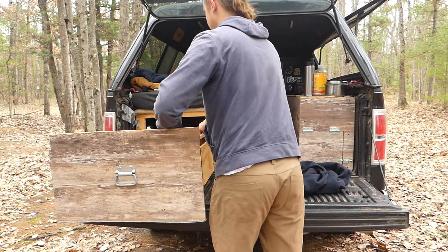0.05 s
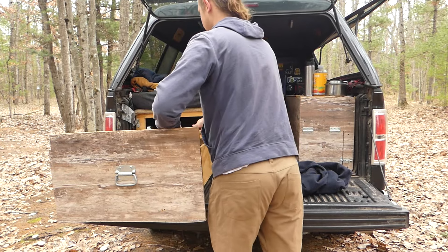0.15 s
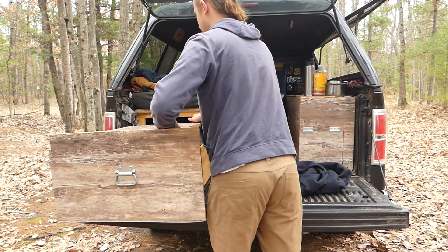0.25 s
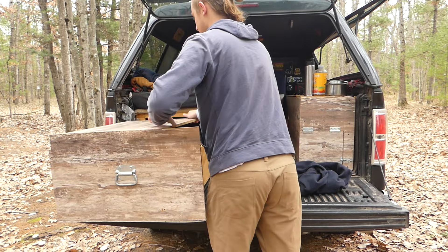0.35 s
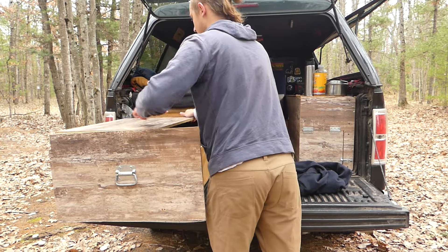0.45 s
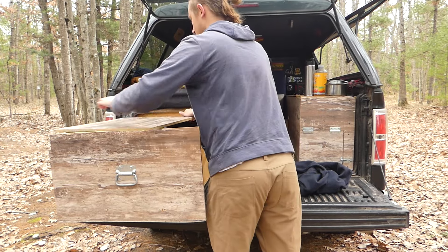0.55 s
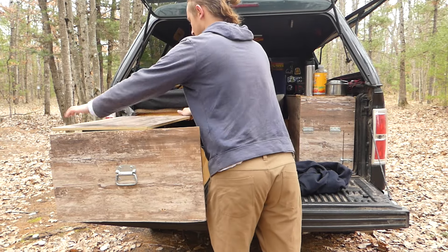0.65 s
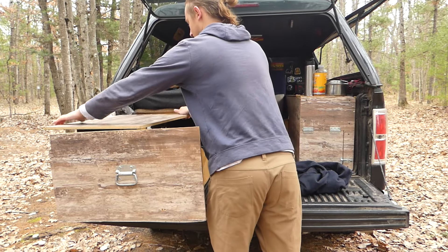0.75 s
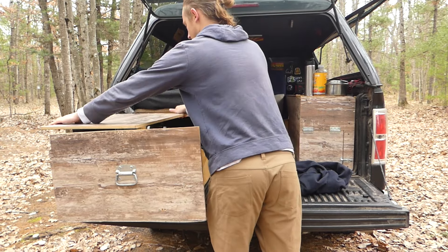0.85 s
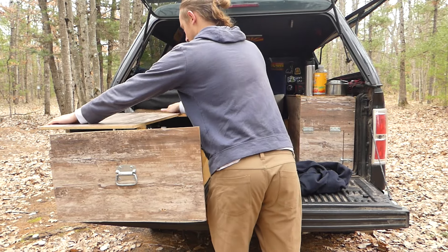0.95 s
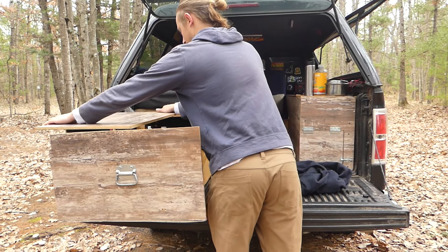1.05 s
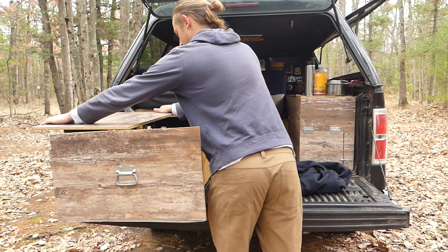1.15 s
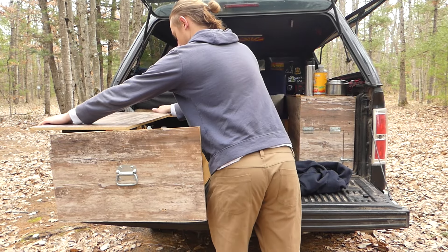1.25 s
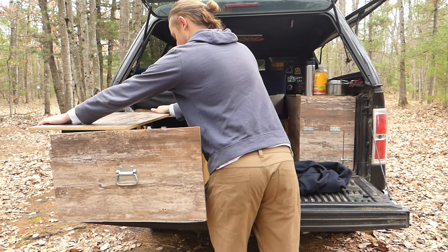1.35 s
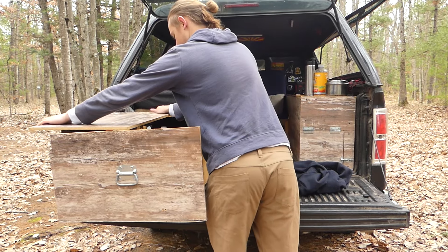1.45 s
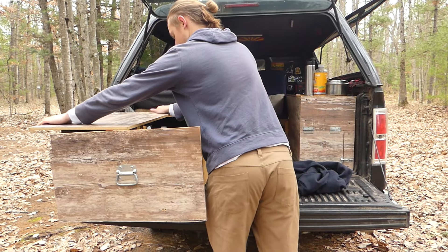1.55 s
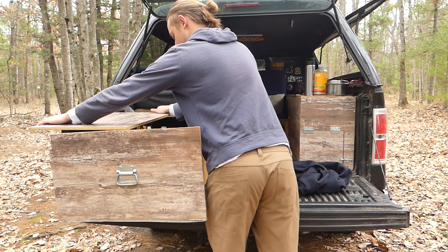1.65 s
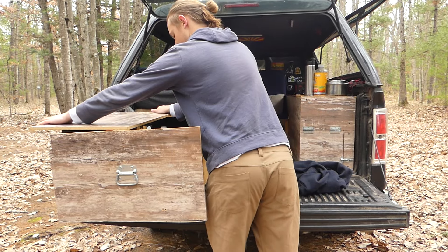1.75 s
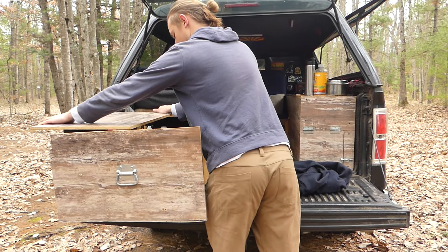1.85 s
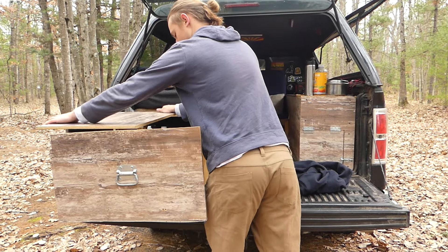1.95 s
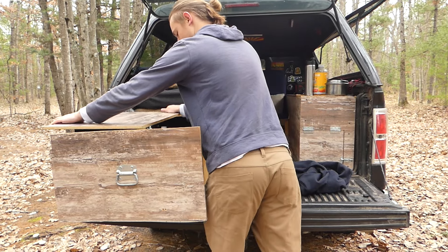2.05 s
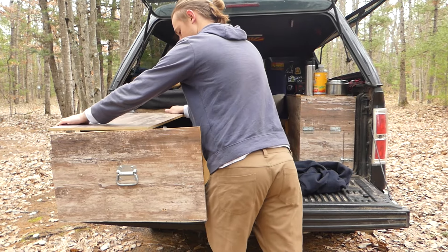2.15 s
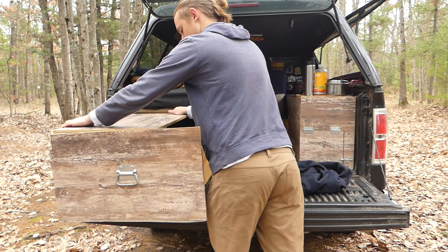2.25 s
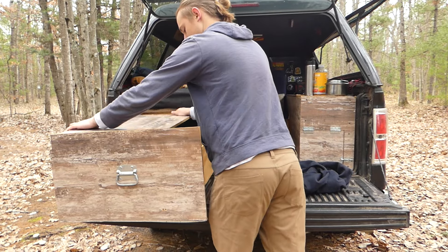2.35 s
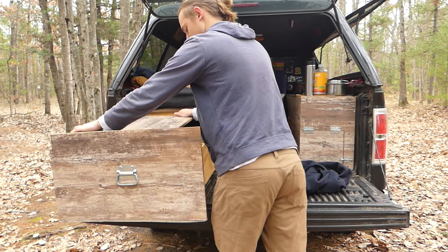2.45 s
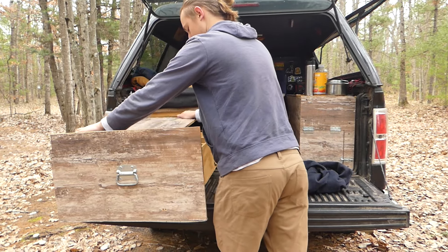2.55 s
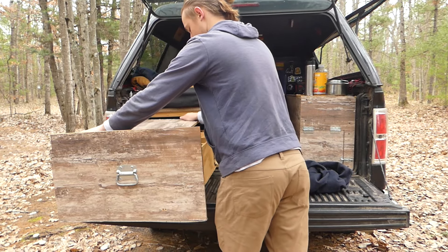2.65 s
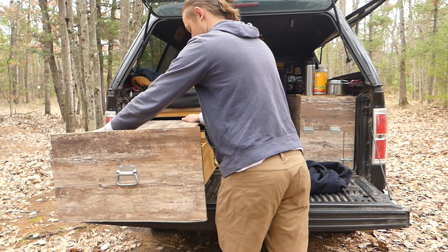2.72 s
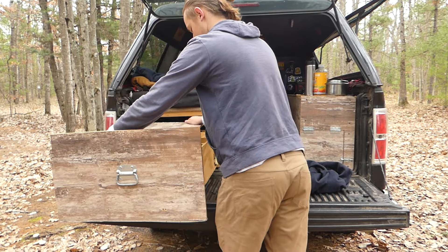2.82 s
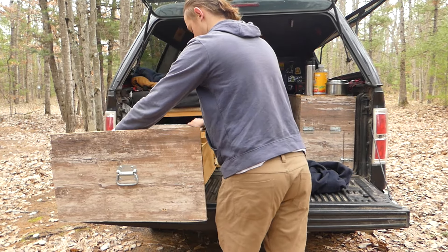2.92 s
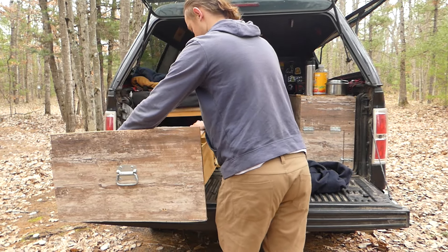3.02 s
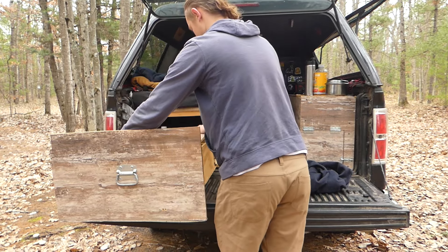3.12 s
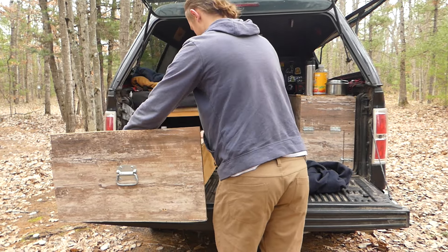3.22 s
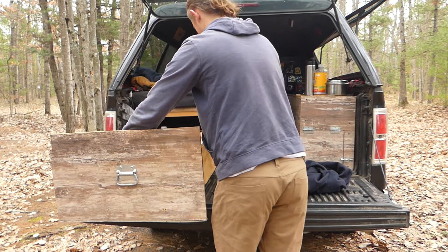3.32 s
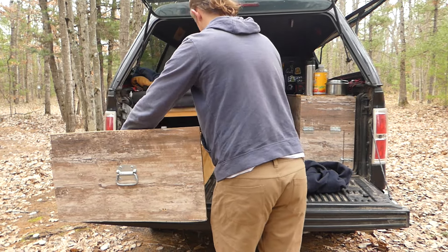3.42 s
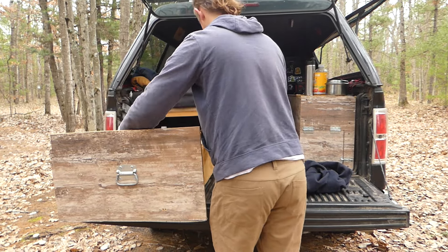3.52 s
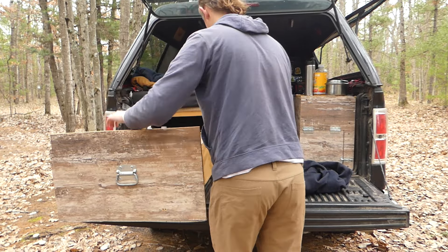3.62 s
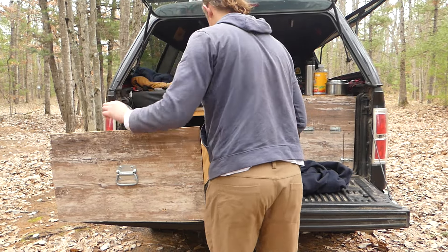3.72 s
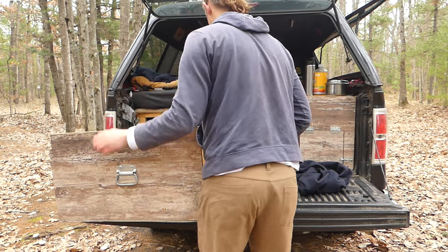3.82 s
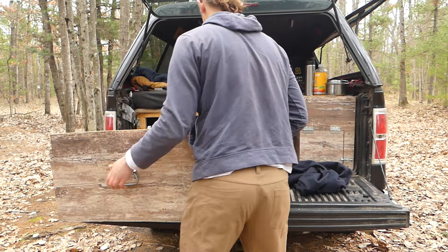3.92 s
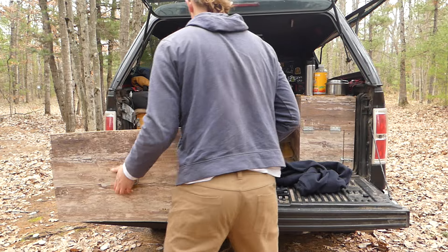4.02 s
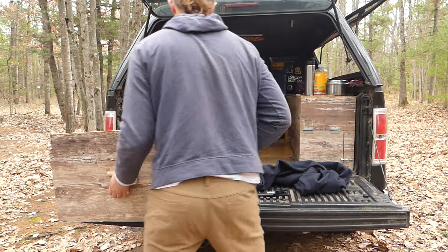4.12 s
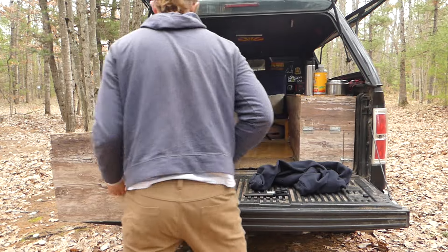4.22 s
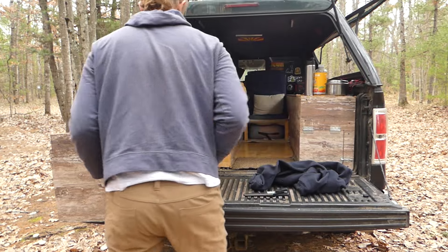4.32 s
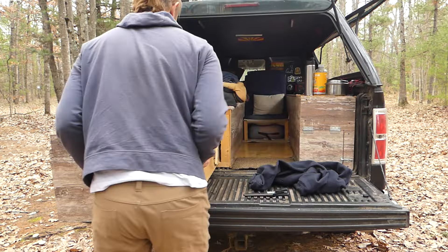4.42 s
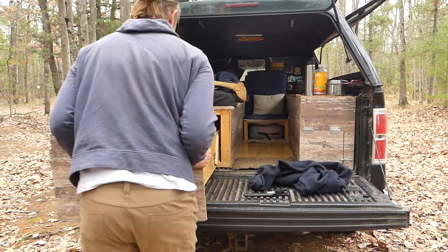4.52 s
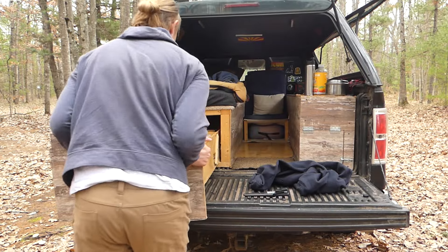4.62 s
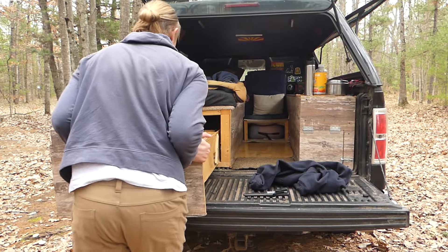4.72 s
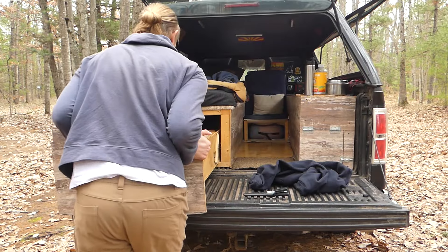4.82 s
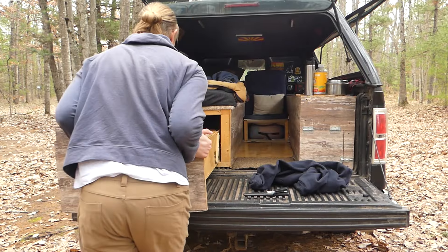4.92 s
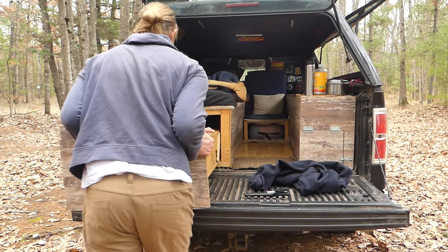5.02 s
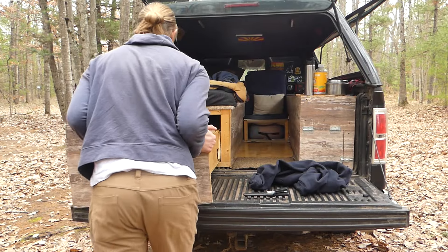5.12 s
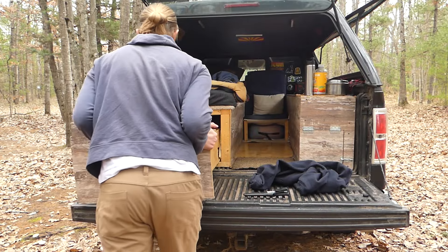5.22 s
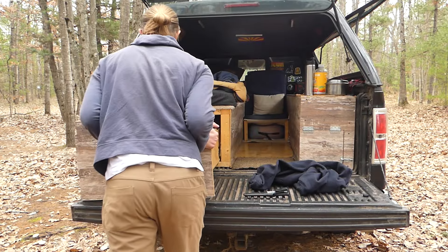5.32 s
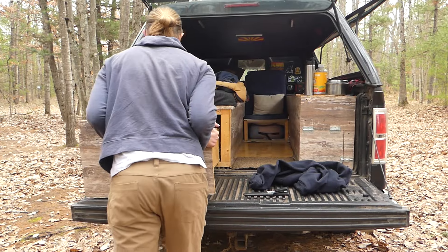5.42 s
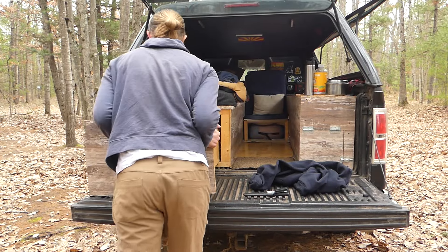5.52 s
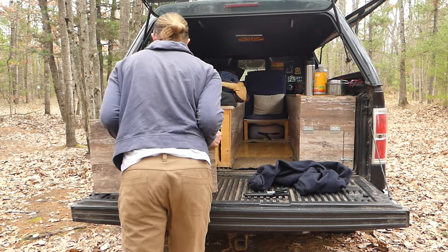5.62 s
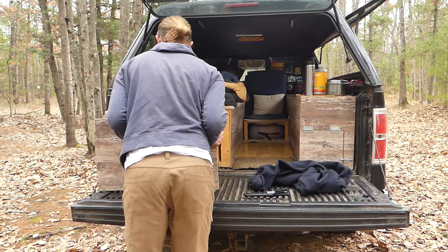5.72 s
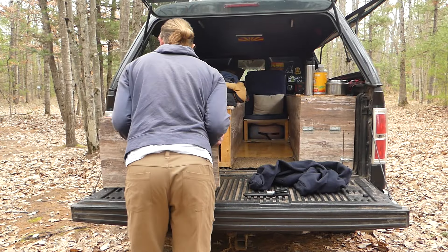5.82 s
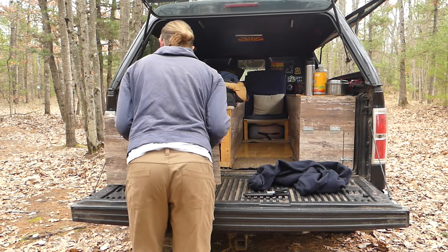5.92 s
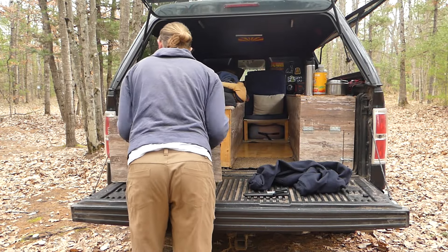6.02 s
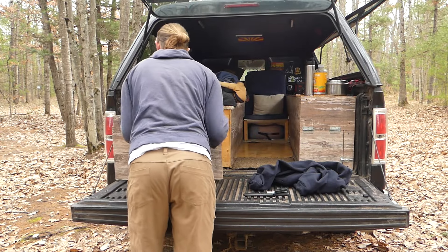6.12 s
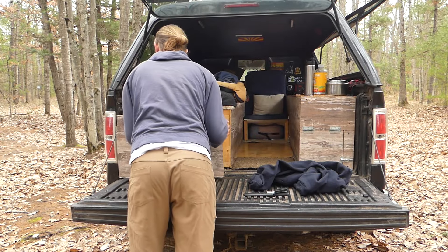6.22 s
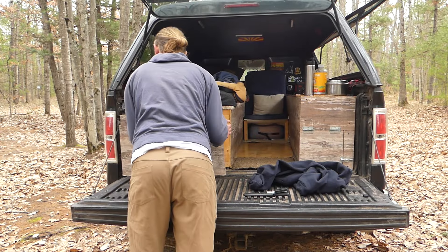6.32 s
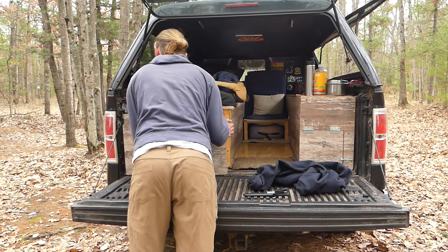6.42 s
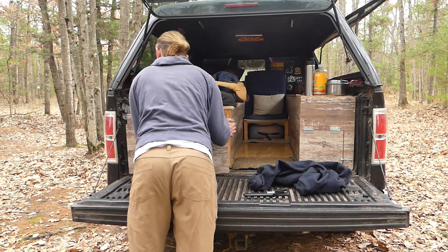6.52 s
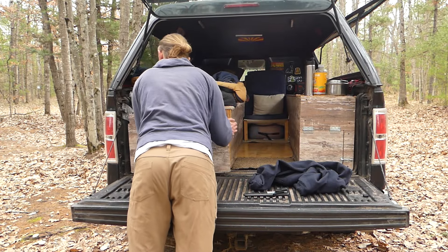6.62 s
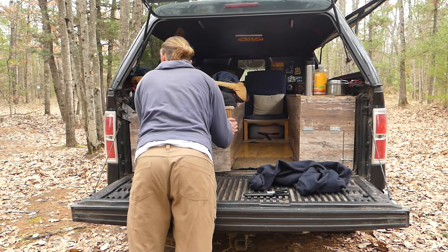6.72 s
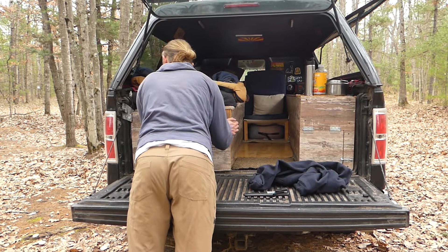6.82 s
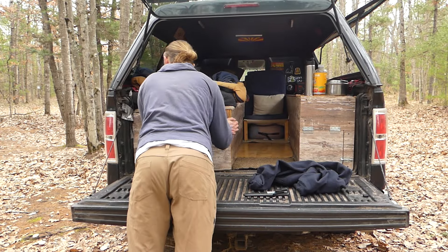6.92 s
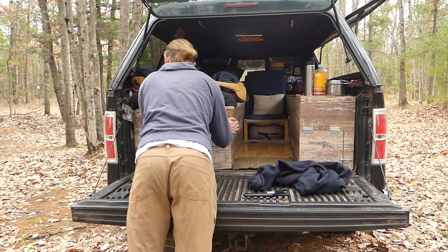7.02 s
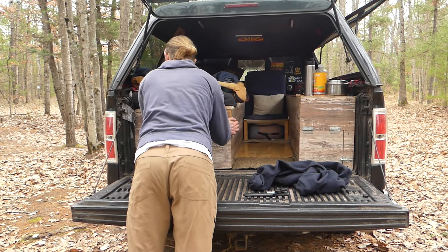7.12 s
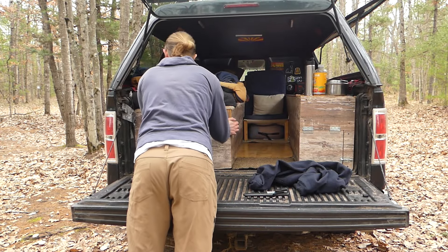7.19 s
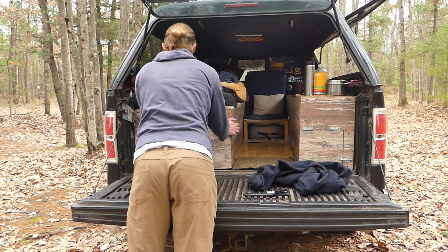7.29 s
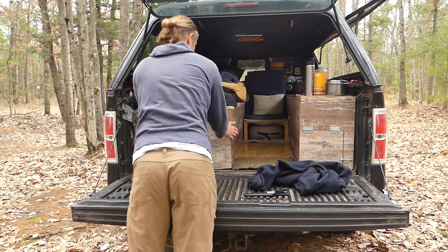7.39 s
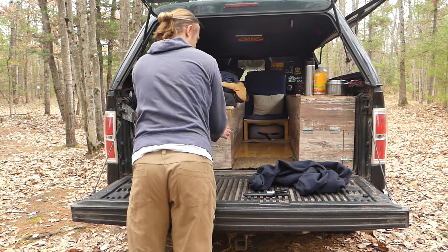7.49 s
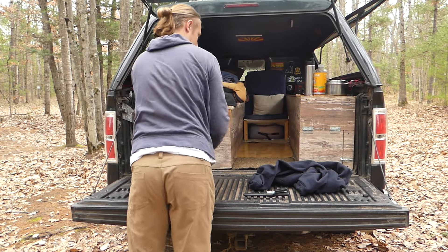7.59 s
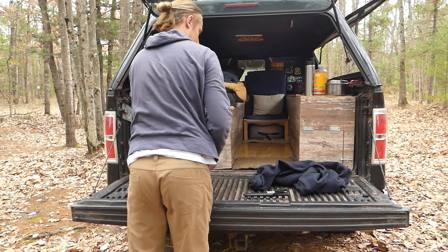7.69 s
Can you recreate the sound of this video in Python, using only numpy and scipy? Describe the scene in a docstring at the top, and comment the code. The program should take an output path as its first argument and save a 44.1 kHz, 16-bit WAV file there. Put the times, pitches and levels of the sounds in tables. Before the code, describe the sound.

Outdoors beside an open truck bed, a wooden lid scrapes and bumps, with a quiet gap before a groaning drag and several hard drops. A sleeve rustles, handles tick, and the drawer front clatters. The heavy drawer jolts, grinds inward with gritty rumbling and bangs shut, followed by another short shove. Near, mostly dry stereo pickup, a faint shell echo and soft forest air.

```python
"""In the still air of a wood, close by, a plywood lid scrapes, moans and drops onto a long wooden drawer.
The drawer, at a truck bed, rattles, chatters after each shove, rumbles along its runners and slams.
Blows are struck wood modes and noise bursts; rubbing is noise shaped by the wood and by uneven gains.
Clothes rustle, small fittings click, and the truck's shell answers each blow with a short noise tail.
The stereo microphone sheds deep bass, and the recorder has a limited top end."""
import sys
import numpy as np
from scipy import signal
from scipy.fft import rfft, irfft, next_fast_len
from scipy.io import wavfile
from scipy.ndimage import uniform_filter1d, map_coordinates

SR = 44100
rng = np.random.default_rng(int(sys.argv[2]) if len(sys.argv) > 2 else 0)


def store_wav(level_fs):
    """Save 16-bit WAV to argv[1]."""
    pcm = np.round(np.clip(np.atleast_2d(level_fs), -1, 1) * 32767)
    wavfile.write(sys.argv[1], SR, pcm.T.astype(np.int16))


N = 341775  # length in samples

# Stereo width of near sounds, then of the air. Each row: frequency in Hz, left-right correlation.
NEAR_CORRELATION = [(40, 0.24), (130, 0.88), (600, 0.88), (2000, 0.86), (6000, 0.83), (13000, 0.7)]
AIR_CORRELATION = [(60, -0.51), (150, -0.91), (380, -0.69), (950, -0.43), (2380, -0.094), (5980, 0.63),
                   (15000, 0.54)]

# Noise colours, only relative. Each row: frequency in Hz, density in dB per Hz.
# The air of the wood:
AIR_SPECTRUM = [(15, -44), (25, -17), (75, -8), (107, -3), (152, -1), (313, -2), (421, 0), (536, -2.5),
                (597, -4.5), (1410, -12), (1530, -14), (2480, -16), (3080, -22), (5720, -23), (15500, -23)]
# The lid's low groan and upper rasp as it drags:
GROAN_SPECTRUM = [(60, -18), (130, -4), (220, 1.5), (290, 5.5), (380, -2.5), (600, -23), (900, -11.5),
                  (1400, -30)]
RASP_SPECTRUM = [(500, -1), (780, 6), (1200, -7.5), (1650, -4), (2100, 1.5), (3000, -6.5), (4000, -12),
                 (8000, -14)]
# The dense modes of plywood:
PLYWOOD_SPECTRUM = [(40, -41), (70, -12), (110, -23), (160, -9.5), (300, -4), (560, -5.5), (800, -9),
                    (1100, -11), (1800, -12), (3000, -17), (5000, -33), (8000, -44.5), (12000, -52.5),
                    (16000, -62)]
# Soft brushing, fine fizz of cloth, and dry rustling:
SWISH_SPECTRUM = [(300, -17.5), (700, -5.5), (1050, -2), (1600, -6.5), (2600, -12), (5000, -34.5)]
FIZZ_SPECTRUM = [(1500, -28), (3000, 2.5), (4800, 2), (8000, -4.5), (11000, -3), (15500, -10)]
CRISP_SPECTRUM = [(1500, -9), (3500, 2), (6000, -0.5), (8000, -6), (11000, 0.5), (13000, -1), (15500, -9)]
# The sliding drawer's rumble, gritty scrape and hiss:
RUMBLE_SPECTRUM = [(24, -60), (40, -39), (102, -6), (125, -3), (146, 2.5), (221, -2), (258, 3), (374, -0.5),
                   (483, -2.5), (624, 1.5), (829, -8.5), (916, -4.5), (1200, -19), (1560, -51),
                   (2640, -120)]
SCRAPE_SPECTRUM = [(500, -2.5), (1000, 2), (2300, -2.5), (3500, -8.5), (5500, -13), (8000, -19.5),
                   (14000, -17.5)]
HISS_SPECTRUM = [(3000, -16), (6000, 1), (8000, -10), (11500, 5), (14000, -14), (16000, -12)]
# A fitting's tick, the slam's crack and shiver, and the flat start of the shell's tail:
TICK_SPECTRUM = [(1000, 22.5), (4000, 9.5), (8000, -7.5), (12000, 1.0), (16000, -18)]
CRACK_SPECTRUM = [(60, -30), (200, 0), (700, 8.5), (2500, -5.5), (6000, -9.5), (15000, -19)]
SHIVER_SPECTRUM = [(100, -27), (200, 2.5), (450, 2), (700, 0.0), (1200, -14), (3500, -12.5),
                   (7000, -43), (15000, -59)]
FLAT_SPECTRUM = [(100, 0), (15000, 0)]

# Modes of lid, box, front panel and end stop. Each row: frequency in Hz, relative level in dB, t60 in seconds.
LID_MODES = [(202.5, -7.5, 0.18), (231.5, -1.5, 0.12), (293.4, -7.5, 0.34), (411.4, 0, 0.2),
             (539, -4.5, 0.14), (781, -4, 0.063), (1133, -18, 0.14), (1576, -10, 0.051), (1717, -14, 0.11),
             (2070, -23, 0.12), (2790, -21, 0.08)]
BOX_MODES = [(75, -28, 0.6), (112.5, -9, 0.31), (148.3, -1, 0.17), (228, -1, 0.084), (292.8, -3, 0.3),
             (343, -1.5, 0.056), (384.4, -3, 0.08), (403.5, -5, 0.085), (508, -8, 0.19), (548.5, -5, 0.15),
             (720, -10, 0.083)]
FRONT_MODES = [(265.5, -8.5, 0.11), (303, 0, 0.062), (328.5, -1.5, 0.15), (520, -4, 0.044),
               (619.5, -11.5, 0.26), (785, -11, 0.28), (1016, -8.5, 0.11), (1695, -17.5, 0.2),
               (2323, -8.5, 0.099), (2780, -11.5, 0.1), (3153, -5.5, 0.04), (3750, -14.5, 0.053)]
STOP_MODES = [(652, -7.5, 0.059), (716, 1.5, 0.031), (840, -4.5, 0.031), (678, -24, 0.33), (757, -23, 0.21),
              (302, -16.5, 0.11), (2250, -21, 0.033)]
# Decay of the truck's shell. Each row: frequency in Hz, t60 in seconds.
SHELL_DECAY = [(100, 0.41), (400, 0.63), (1000, 0.43), (3000, 0.94), (8000, 0.93), (15000, 0.36)]

# The lid drags over the rim. Each row: start in seconds, length in seconds, groan and rasp in dB before trim.
LID_DRAGS = [(0.03, .46, -47, -51), (.23, .1, -41, -58), (0.66, .42, -49, -58), (2.33, .11, -50, -60),
             (2.54, .14, -48, -45), (2.74, .54, -37, -35), (3.36, .15, -43, -36)]
# The lid bumps and drops. Each row: start in seconds, level in dB before trim, hardness in dB,
# ring t60 in seconds.
LID_DROPS = [(0.123, -30, -12.5, 0.29), (0.168, -27.5, -11.5, 0.14), (0.622, -14, -36, 0.075),
             (0.738, -36, -26, 0.11), (0.782, -32, -26, 0.068), (0.932, -17.5, -15, 0.1),
             (2.493, -10, -28, 0.1), (2.788, -28.5, -13.5, 0.073), (3.15, -11, -18, .17),
             (3.177, -18.5, -32, 0.21), (3.286, -11, -5.5, 0.16), (3.293, -5, -6, 0.22),
             (3.303, -10.5, 2, 0.079), (3.344, -19, -15, .07)]
# Wood scuffs wood. Each row: start in seconds, level in dB before trim, rise in seconds (held to 3 ms or more).
SCUFFS = [(.348, -39.5, 0.012), (.403, -35, 0.0097), (.578, -29.5, 0.016), (0.598, -27.5, 0.01),
          (1.839, -38, 0.005), (2, -30, 0.0059), (2.058, -26.5, 0.0036), (2.064, -32.5, 0.024),
          (2.084, -37, 0.0024), (3.148, -18.5, 0.0058), (3.172, -25, .014), (3.27, -26, .014),
          (5.261, -29, 0.024), (5.405, -14.5, 0.027), (5.828, -24.5, 0.012), (5.9, -34, .02),
          (5.995, -20.5, 0.014), (6.623, -28.5, 0.011), (7.152, -13, 0.0085)]
# Small hard fittings. Each row: start in seconds, level in dB before trim, bite in dB against the treble,
# chatter t60 in seconds.
CLICKS = [(0.606, -35.5, 4, .05), (0.9236, -38.5, 4.5, .09), (3.2121, -33.5, -4, .067),
          (3.83, -37, 10, .018), (4.113, -28, 4, .05), (4.1256, -16, 6, 0.031), (4.133, -22, -6, .06),
          (4.1614, -35, 17.5, 0.035), (4.203, -31.5, 3, 0.06), (4.321, -21, -4, 0.07),
          (4.437, -20, -4, 0.085), (4.452, -19, -3, 0.074), (4.8428, -19.5, 2.5, 0.087),
          (4.927, -19, -1, 0.16), (6.8793, -21, 0, 0.066), (7.496, -16, -6, 0.077)]
# A hand brushes the lid. Each row: start in seconds, length in seconds, level in dB before the cloth mix.
HAND_BRUSHES = [(1.82, 0.39, -48)]
# Sleeves swish. Each row: start in seconds, length in seconds, level in dB before the cloth mix.
SLEEVES = [(3.3, 0.29, -51), (3.72, 0.59, -42)]
# The body shifts. Each row: start in seconds, length in seconds, level in dB.
RUSTLES = [(3.387, 0.026, -40.5), (3.448, 0.056, -43.5), (4.89, .13, -42.5), (5.26, 0.061, -45.5),
           (5.41, 0.12, -46), (5.82, 0.73, -48), (6.84, 0.12, -45), (7.07, .16, -44), (7.383, .028, -39.5),
           (7.423, 0.029, -34)]
# Dull thumps under the lid. Each row: start in seconds, level in dB, frequency in Hz.
THUMPS = [(2.406, -33, 137), (2.61, -39, 131), (2.66, -38.5, 142), (2.816, -34, 116), (2.92, -40, 110),
          (3.485, -37, 139), (3.63, -43, 200)]
# The moan's falling, then rising pitch. Each row: time in seconds, slips per second.
SLIP_RATE = [(2.8, 262), (2.951, 208), (3.05, 184), (3.15, 130), (3.26, 210)]
# Single bumps of the box. Each row: start in seconds, level in dB before trim, hardness in dB,
# boom in dB before trim, ring t60 in seconds.
BOX_BUMPS = [(4.093, -16.5, -30, -26, 0.079), (4.959, -10.5, -19, -23, .14), (4.984, -13, -15, -15, 0.08),
             (5.081, -28, -11, -30, 0.055), (5.879, -20.5, -9, -15, 0.094), (6.131, -16, -15.5, -14, 0.24),
             (6.69, -17, -10.5, -11.5, 0.1), (6.82, -18.5, -37, -34, 0.22),
             (6.829, -14.5, -21.5, -28, 0.11), (6.95, -18, -28, -23, 0.072), (7.15, -8.5, -18, -26, 0.048)]
# Shoves. Each row: start in seconds, level in dB before trim, hardness in dB, boom in dB before trim,
# chatter length in seconds, chatter fade in dB per second.
JOLTS = [(4.858, -6, -17.5, -8.5, .08, 77), (5.397, -3, -22, -36, .24, 62),
         (7.157, -3, -19, -19, .085, 128)]
# The drawer's travel. Each row: time in seconds, rumble level in dB.
TRAVEL = [(4.14, -41), (4.34, -41), (4.42, -37.5), (4.6, -53.5), (4.88, -42.5), (5.02, -41.5), (5.31, -40),
          (5.4, -38), (5.54, -34.5), (6.13, -30.5), (6.38, -36), (6.67, -42), (7.1, -33.5), (7.41, -37.5),
          (7.54, -43.5), (7.72, -52.5)]
# The front rattles in the hands. Each row: start in seconds, level in dB before trim, hardness in dB,
# ring t60 in seconds.
FRONT_RATTLES = [(4.303, -24.5, 9, 0.095), (4.321, -18.5, -6, 0.12), (4.345, -14, -1.5, 0.082),
                 (4.364, -14.5, -8.5, 0.16), (4.408, -9.5, -7.5, 0.095), (4.437, -13.5, -5, .13),
                 (4.452, -16, -3, 0.3), (4.484, -5, -6.5, 0.1), (4.545, -18.5, -2.5, 0.096),
                 (7.493, -15.5, 0, 0.16), (7.522, -16, -4.5, 0.099), (7.727, -24.5, -9.5, 0.24)]

AIR_DB, SLIP_DB = -46.35, -45.5
THUMP_RISE_S, STOP_S = 0.0086, 6.910
FIRST_REBOUND_S, REBOUND_GAP_S, REBOUND_SCATTER_S = .016, .027, .002
REBOUND_DB = -4  # against the jolt, before the fade
REBOUND_HARDNESS_DB, REBOUND_BOOM_DB = -15.5, -12.5  # boom before trim
CRUISE_DB = -33  # reference level of travel
SCRAPE_GROWS, HISS_GROWS = 1.01, 1.4  # dB per dB of travel
TOP_HZ = 15700  # recorder's upper limit


def amp(db):
    """Decibels to gain."""
    return 10 ** (np.asarray(db) / 20)


def unit(x):
    """Scaled to rms 1."""
    return x / np.sqrt(np.mean(x ** 2) + 1e-20)


def along(points, hz):
    """(Hz, value) points read on a log frequency axis."""
    f, v = np.transpose(points)
    return np.interp(np.log(hz + 1), np.log(f + 1), v)


def wobble(rate):
    """A smooth random curve, rate knots a second."""
    knots = rng.standard_normal(int(N * rate / SR) + 4)
    return map_coordinates(knots, [np.arange(N) * rate / SR])


def filtered(x, response):
    """x shaped by a gain for each frequency."""
    n = x.shape[-1]
    m = next_fast_len(n + 8192)  # spare room keeps the end from wrapping round
    return irfft(rfft(x, m) * response(np.fft.rfftfreq(m, 1 / SR)), m)[..., :n]


def noise(spectrum, size, correlation=NEAR_CORRELATION):
    """Coloured stereo noise of rms 1; the mid and side shares set how alike left and right are."""
    def mid_side_gain(hz):
        turn = np.arccos(np.clip(along(correlation, hz), -1, 1)) / 2
        return amp(along(spectrum, hz)) * [np.cos(turn), np.sin(turn)]

    mid, side = filtered(rng.standard_normal((2, size)), mid_side_gain)
    return unit(np.array([mid + side, mid - side]))


def band(x, edges):
    """One band of a blow, scaled to rms 1 over its loudest 8 ms."""
    y = signal.sosfilt(signal.butter(3, edges, 'bandpass', fs=SR, output='sos'), x)
    return y / np.sqrt(uniform_filter1d(np.mean(y ** 2, axis=0), size=353).max())


def mode(hz, db, t60, t):
    """One damped sine."""
    return amp(db - 60 * t / t60) * np.sin(2 * np.pi * hz * t)


def ring(modes, t, scatter_db):
    """Damped modes, struck at new strengths and signs each time."""
    return sum(rng.choice([-1, 1]) * mode(hz, db + rng.normal(0, scatter_db), t60, t)
               for hz, db, t60 in modes)


def swell(t, rise):
    """A gain that peaks at 1 after rise seconds, then fades."""
    u = t / rise
    return (u * np.exp(1 - u)) ** 2


def add(track, s, sound):
    """Mix a sound in at time s."""
    part = track[:, round(s * SR):][:, :sound.shape[-1]]
    part += sound[..., :part.shape[1]]


def strokes(rows, roundness, skew=1):
    """Gain of (start, length, dB) arches: flatter at low roundness, peaking early at a skew under 1."""
    t = np.arange(N) / SR
    gain = np.zeros(N)
    for s, length, db in rows:
        u = np.clip((t - s) / length, 0, 1) ** skew
        gain += amp(db) * (4 * u * (1 - u)) ** roundness
    return gain


def resonate(x, modes, lift_db):
    """Rubbing noise is lifted at each mode's frequency, more narrowly for a long ring; rms 1."""
    def peaks(f):
        lift = sum(1 / (1 + ((f - hz) * t60 * np.pi / np.log(1000) / 2) ** 2) for hz, _, t60 in modes)
        return 1 + amp(lift_db) * lift

    return unit(filtered(x, peaks))


def knock(modes, hardness_db, t60, rise, modes_db, tilt_db, boom_db, clack_db, snap_db,
          clack_life, snap_life):
    """A blow rings main modes and the plywood's dense ones; harder contact adds clack and snap."""
    t = np.arange(SR // 2) / SR
    tilted = [(hz, db + tilt_db * np.log2(hz / 500)) for hz, db in PLYWOOD_SPECTRUM]  # dB per octave
    ply = noise(tilted, len(t))
    tone = amp(modes_db) * ring(modes, t, scatter_db=6.5)

    def dying(life):
        return amp(-60 * t / life)

    def wood(life):
        return ply * dying(life) + tone * dying(3 * life)

    body = wood(t60) * (1 - np.exp(-t / rise))  # the panel takes a moment to move
    low = band(body, (180, 1000)) + amp(boom_db) * band(body, (70, 180))
    clack = amp(clack_db) * band(wood(clack_life * t60), (1000, 4500))
    contact = amp(-18.5) * dying(0.014)  # brief crack of first touch
    snap = amp(snap_db) * band(ply * (contact + dying(snap_life * t60)), (4200, 16000))
    return low + amp(hardness_db) * (clack + snap)


def woods():
    """Still forest air: wide coloured noise whose level barely drifts."""
    return amp(AIR_DB + 0.15 * wobble(1.8)) * noise(AIR_SPECTRUM, N, AIR_CORRELATION)


def drag():
    """The lid's edge catches and slips, so the panel groans and rasps at its own modes."""
    catch = unit(amp(2.5 * wobble(28)))
    low = resonate(noise(GROAN_SPECTRUM, N) * catch, LID_MODES, lift_db=4)
    grit = resonate(noise(RASP_SPECTRUM, N) * catch * amp(2 * wobble(500)), LID_MODES, lift_db=5)
    groan = strokes([(s, length, db) for s, length, db, _ in LID_DRAGS], roundness=0.25)
    rasp = strokes([(s, length, db) for s, length, _, db in LID_DRAGS], roundness=0.33)
    return amp(-6) * groan * low + amp(-13.5) * rasp * grit


def lid_drops():
    """The loose lid knocks on the drawer's rim and rings at its own modes."""
    out = np.zeros((2, N))
    for s, db, hardness, t60 in LID_DROPS:
        blow = knock(LID_MODES, hardness, t60, rise=0.0017, modes_db=-0.5, tilt_db=-1.5, boom_db=-10,
                     clack_db=5.0, snap_db=-8, clack_life=0.63, snap_life=1.0)
        add(out, s, amp(db - 7) * blow)
    return out


def shell(x):
    """The truck's shell and the trees answer 9 ms late; each frequency dies at its own speed."""
    hz, t, z = signal.stft(noise(FLAT_SPECTRUM, SR // 2), SR, nperseg=256)
    decay = amp(-60 * t / along(SHELL_DECAY, hz)[:, None])
    tail = signal.istft(z * decay, SR, nperseg=256)[1]
    late = np.pad(x, ((0, 0), (400, 0)))
    return signal.fftconvolve(late, tail / np.linalg.norm(tail[0]), axes=1)[:, :N]


def scuffs():
    """Wood scuffs wood: brief gritty strokes of noise swell and fade."""
    out, t = np.zeros((2, N)), np.arange(SR // 4) / SR
    for s, db, rise in SCUFFS:
        add(out, s, amp(db - 10.0) * swell(t, max(rise, .003)) * noise(SWISH_SPECTRUM, len(t)))
    grit = unit(amp(2.2 * wobble(700)))
    return out * grit


def clicks():
    """Handles and catches tick: a sharp crack and a short bright chatter of noise."""
    out, t = np.zeros((2, N)), np.arange(SR // 4) / SR
    for s, db, bite_db, t60 in CLICKS:
        fade = amp(-60 * t / 0.0042) + 1.2 * amp(-60 * t / t60)
        tick = noise(TICK_SPECTRUM, len(t)) * fade
        bite, top = band(tick, (1000, 4500)), band(tick, (4500, 16000))
        add(out, s, amp(db - 10) * (top + amp(bite_db) * bite))
    return out


def rubs():
    """A hand brushes the lid and the sweatshirt rustles: noise made uneven by many fibres."""
    hand, sleeves = strokes(HAND_BRUSHES, roundness=1.8), strokes(SLEEVES, roundness=0.9)
    fibres = unit(amp(.8 * wobble(40) + 1.8 * wobble(1200)))
    swish = (hand + sleeves) * noise(SWISH_SPECTRUM, N)
    fizz = (amp(.5) * sleeves + amp(-10.5) * hand) * noise(FIZZ_SPECTRUM, N)
    rustle = strokes(RUSTLES, roundness=1.0, skew=0.6) * noise(CRISP_SPECTRUM, N)
    return fibres * (swish + fizz + rustle)


def thumps():
    """Soft contacts move only one low mode, which swells and dies in a few cycles."""
    out, t = np.zeros((2, N)), np.arange(SR // 4) / SR
    for s, db, hz in THUMPS:
        add(out, s, amp(db) * swell(t, THUMP_RISE_S) * np.sin(2 * np.pi * hz * t))
    return out


def slip():
    """Regular sticking and slipping makes the lid moan, its unsteady pitch falling and then rising."""
    s, hz = np.transpose(SLIP_RATE)
    rate = np.interp(np.arange(N) / SR, s, hz) * (1 + 0.0498 * wobble(90))
    moan = np.sin(2 * np.pi * np.cumsum(rate) / SR) * amp(2.5 * wobble(24.8))
    return strokes([(s[0], s[-1] - s[0], SLIP_DB)], roundness=0.27) * unit(moan)


def box_bumps():
    """The whole box bumps on its runners; after a jolt it rebounds in a fading chatter."""
    out = np.zeros((2, N))

    def bump(db, hardness, boom, t60):
        blow = knock(BOX_MODES, hardness, t60, rise=0.0017, modes_db=-2.5, tilt_db=-0.85,
                     boom_db=boom + 4.5, clack_db=6.0, snap_db=-5, clack_life=0.93, snap_life=1.0)
        return amp(db - 7.0) * blow

    for s, db, hardness, boom, t60 in BOX_BUMPS:
        add(out, s, bump(db, hardness, boom, t60))
    for s, db, hardness, boom, length, fade in JOLTS:
        add(out, s, bump(db, hardness, boom, t60=0.13))
        for after in np.arange(FIRST_REBOUND_S, length, REBOUND_GAP_S):
            when = s + after + rng.normal(0, REBOUND_SCATTER_S)
            level_db = db + REBOUND_DB - fade * after
            add(out, when, bump(level_db, REBOUND_HARDNESS_DB, REBOUND_BOOM_DB, t60=0.17))
    return out


def slide():
    """Wood judders along the runners: box rumble, gritty scraping, and hiss that grows fastest with travel."""
    s, level_db = np.transpose(TRAVEL)
    pace_db = np.interp(np.arange(N) / SR, s, level_db, left=-120) - CRUISE_DB
    judder, grain = wobble(45), wobble(450)
    rumble = noise(RUMBLE_SPECTRUM, N) * amp(2.4 * judder + 0.4 * grain)
    scrape = noise(SCRAPE_SPECTRUM, N) * amp(1.4 * judder + 1.45 * grain + 1.6 * wobble(16))
    low = amp(pace_db + CRUISE_DB) * resonate(rumble, BOX_MODES, lift_db=-8.5)
    grit = amp(SCRAPE_GROWS * pace_db - 38.5) * resonate(scrape, FRONT_MODES, lift_db=-11)
    hiss = amp(HISS_GROWS * pace_db - 55.5) * noise(HISS_SPECTRUM, N)
    return low + grit + hiss


def front_rattles():
    """The light front panel clatters brightly, with almost no boom."""
    out = np.zeros((2, N))
    for s, db, hardness, t60 in FRONT_RATTLES:
        blow = knock(FRONT_MODES, hardness, t60, rise=0.0022, modes_db=-1.0, tilt_db=2.5, boom_db=-29,
                     clack_db=3.5, snap_db=-5, clack_life=1.0, snap_life=0.73)
        add(out, s, amp(db - 6.5) * blow)
    return out


def slam():
    """The drawer hits its stop: a hard modal bang and crack, then the runners and the load shiver."""
    out, t = np.zeros((2, N)), np.arange(SR // 2) / SR
    contact = 1 - np.exp(-t / .0007)
    bang = contact * sum(mode(hz, db, t60, t) for hz, db, t60 in STOP_MODES)
    crack_fade = amp(-9 - 60 * t / 0.026) + amp(-8.5 - 60 * t / 0.088)
    crack = noise(CRACK_SPECTRUM, len(t)) * crack_fade
    shiver = noise(SHIVER_SPECTRUM, len(t)) * amp(-20.5 - 60 * t / 0.41)
    add(out, STOP_S, amp(3.5) * bang + crack + shiver)
    return out


def scene():
    """Blows and their echo over the sliding, the rustle and the forest."""
    lid_side = amp([[-.6], [.6]])  # the lid is a little louder on the right
    blows = lid_side * (lid_drops() + thumps()) + front_rattles() + box_bumps() + clicks() + slam()
    lid_rubbing = lid_side * (drag() + slip())
    return blows + amp(-18.0) * shell(blows) + scuffs() + lid_rubbing + slide() + rubs() + woods()


def record(dry):
    """The microphone sheds deep bass; the recorder clips at full scale and cuts the extreme treble."""
    heard = signal.sosfilt(signal.butter(2, 45, 'highpass', fs=SR, output='sos'), dry)
    return filtered(np.clip(heard, -1, 1), lambda hz: hz < TOP_HZ)


dry = scene()
out = record(dry)
store_wav(out)
```